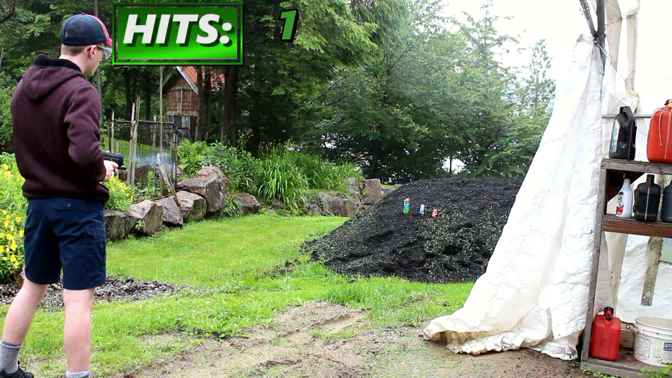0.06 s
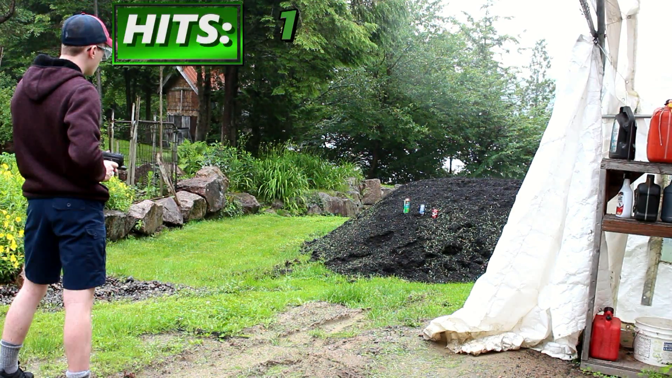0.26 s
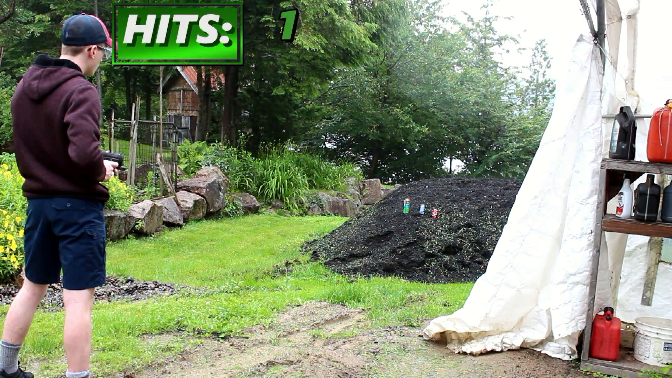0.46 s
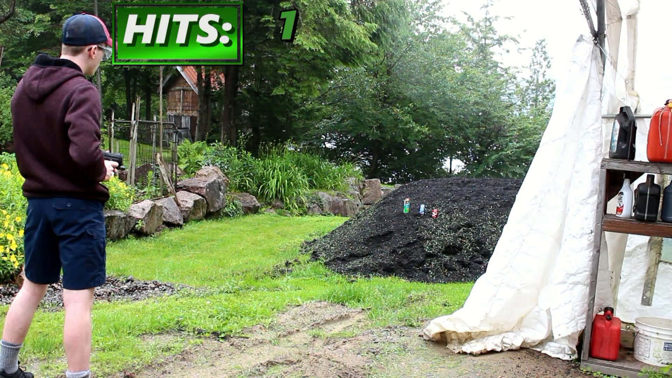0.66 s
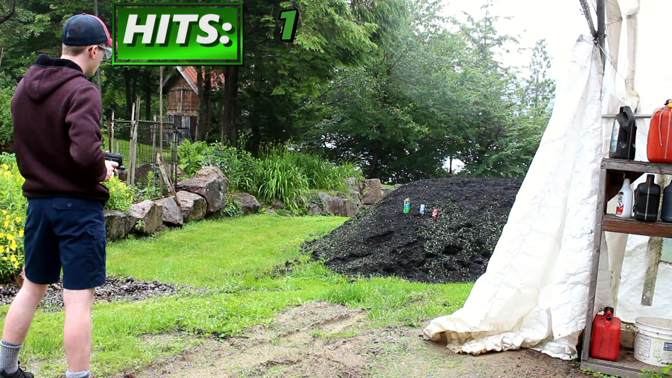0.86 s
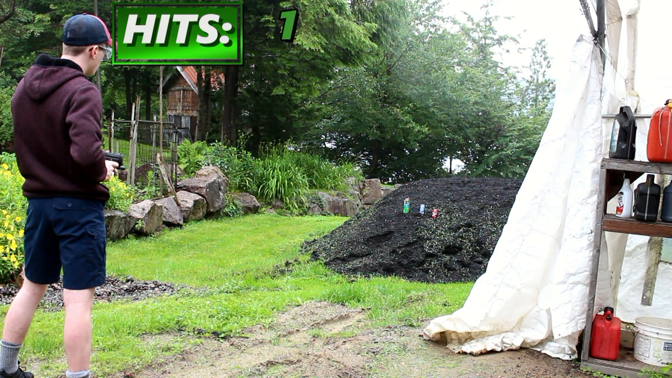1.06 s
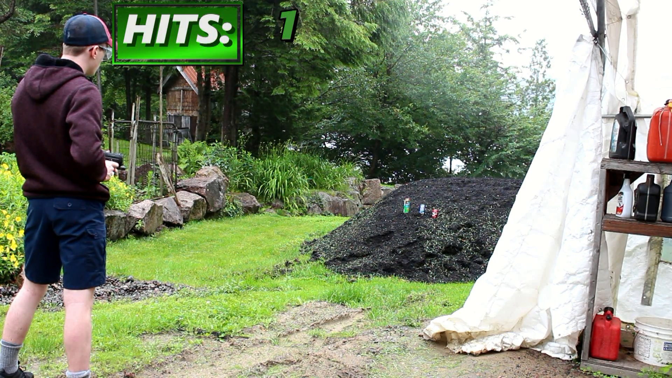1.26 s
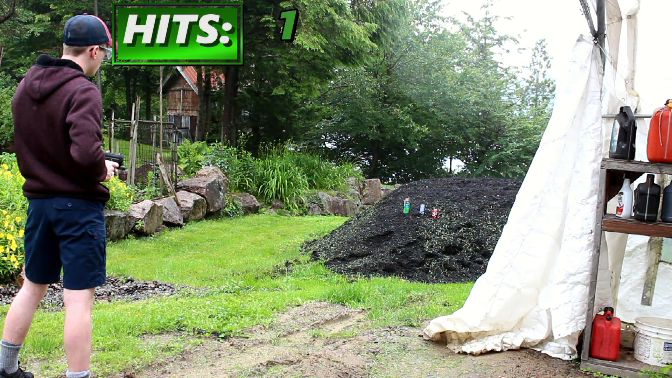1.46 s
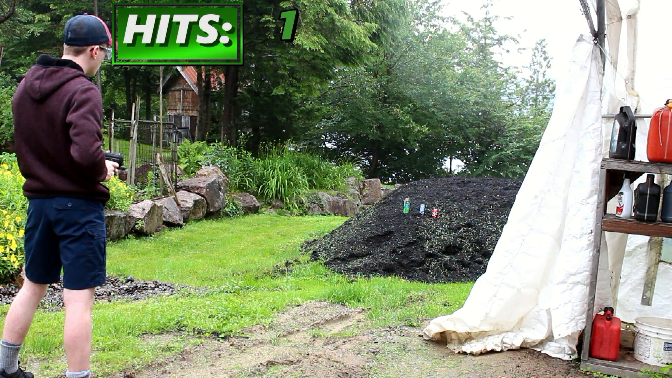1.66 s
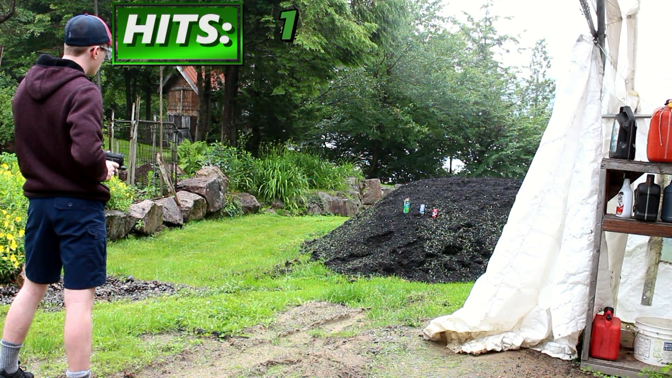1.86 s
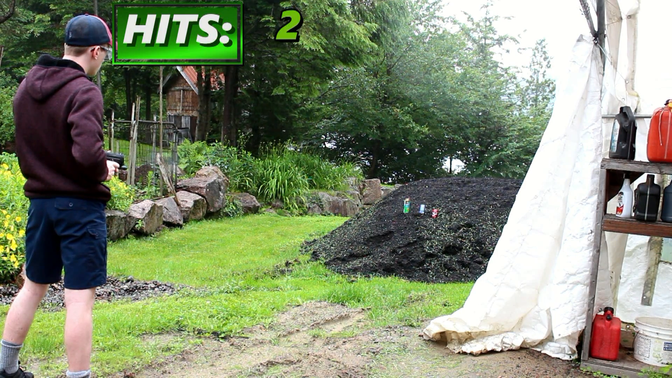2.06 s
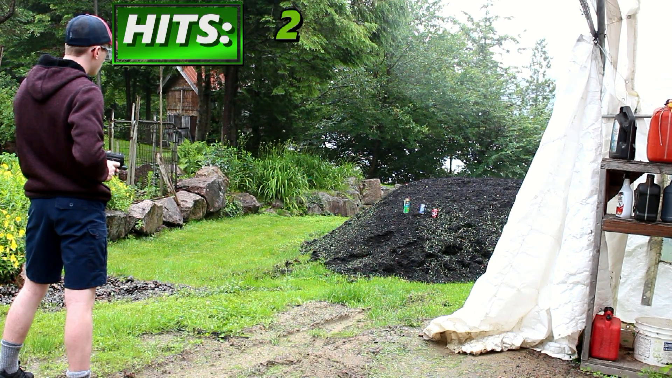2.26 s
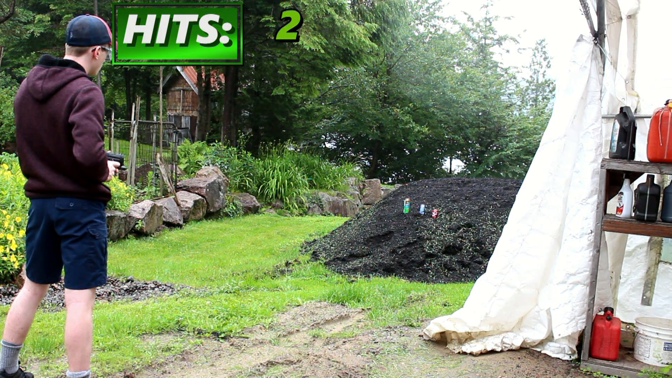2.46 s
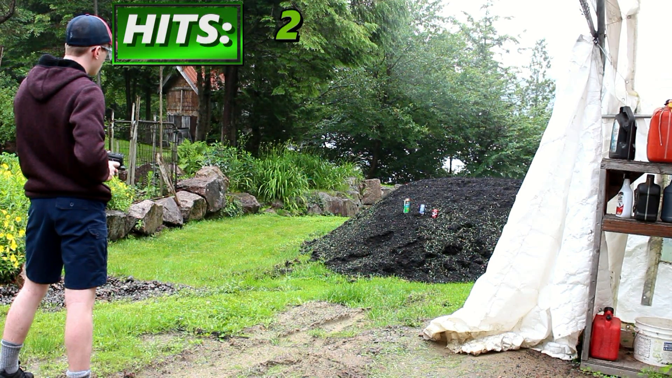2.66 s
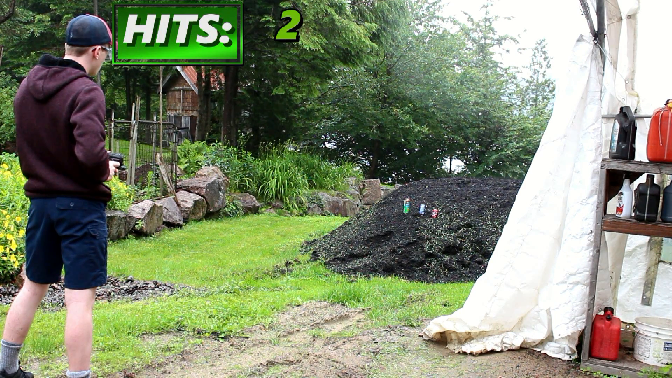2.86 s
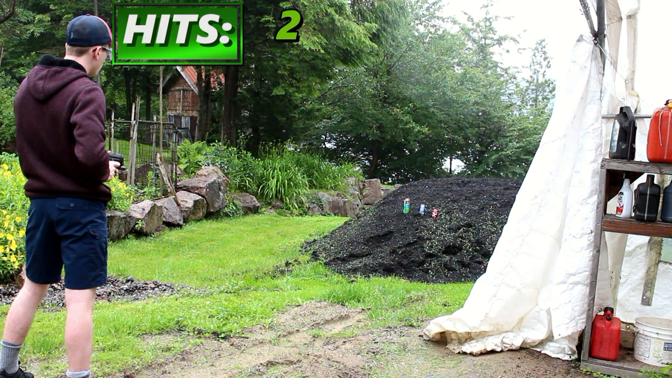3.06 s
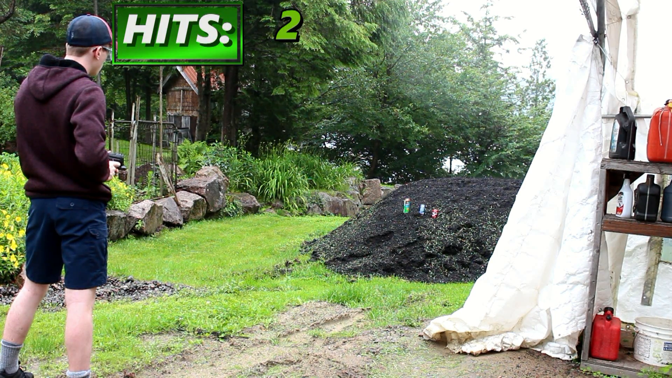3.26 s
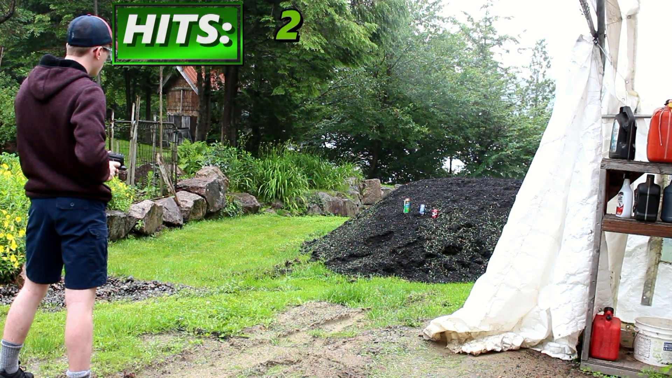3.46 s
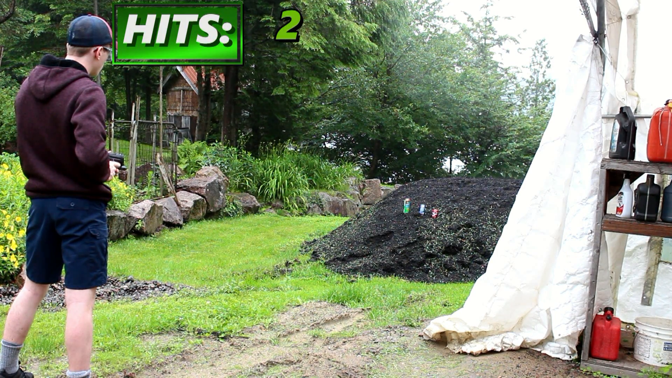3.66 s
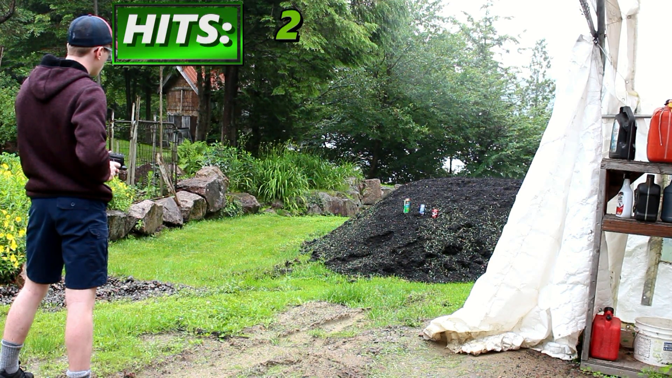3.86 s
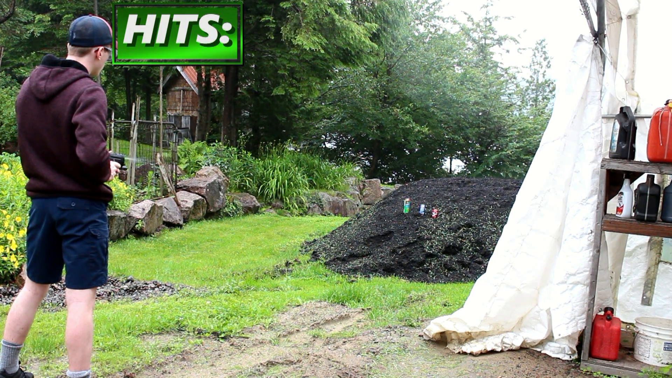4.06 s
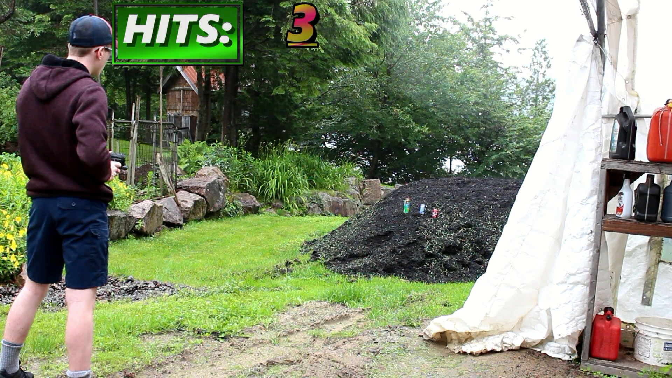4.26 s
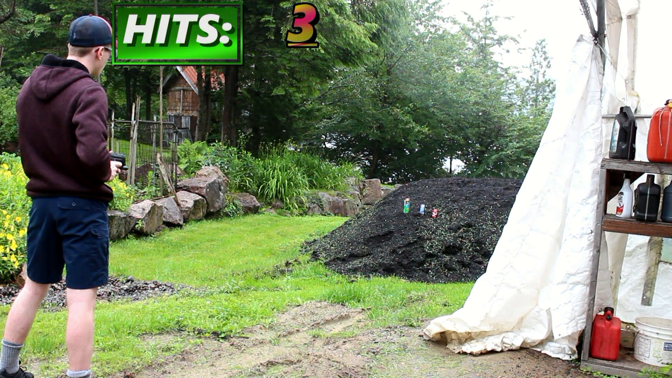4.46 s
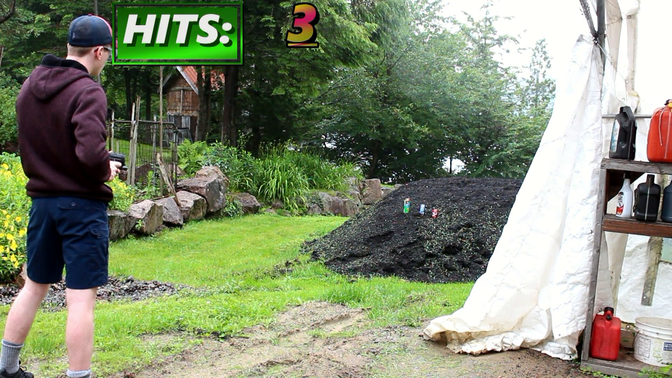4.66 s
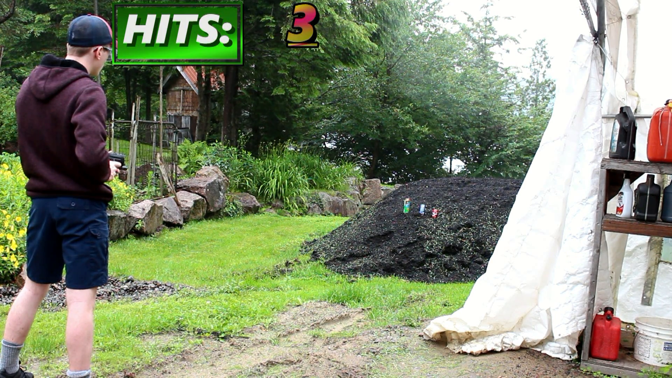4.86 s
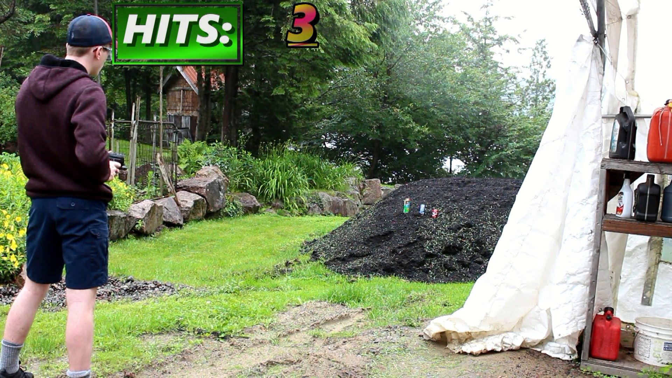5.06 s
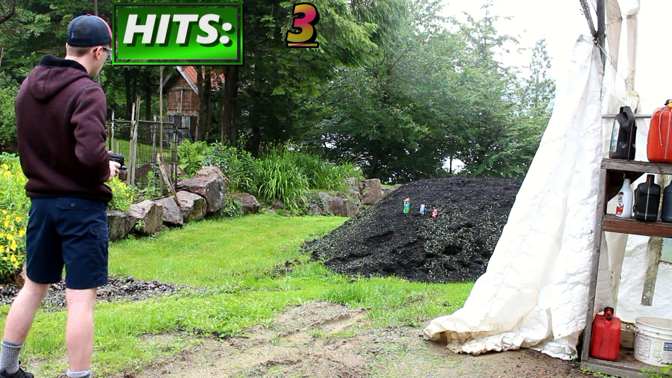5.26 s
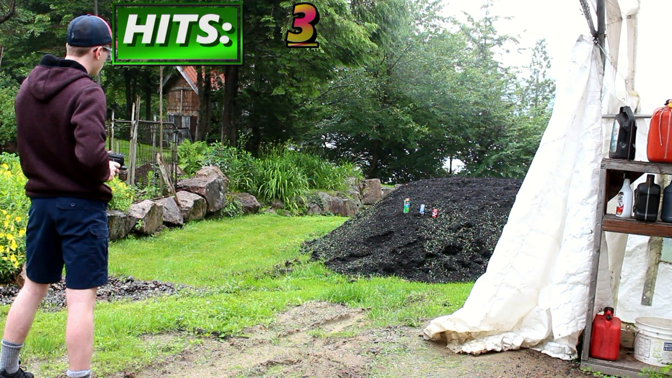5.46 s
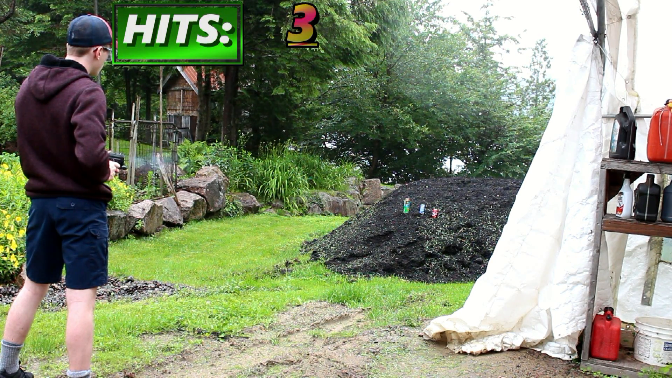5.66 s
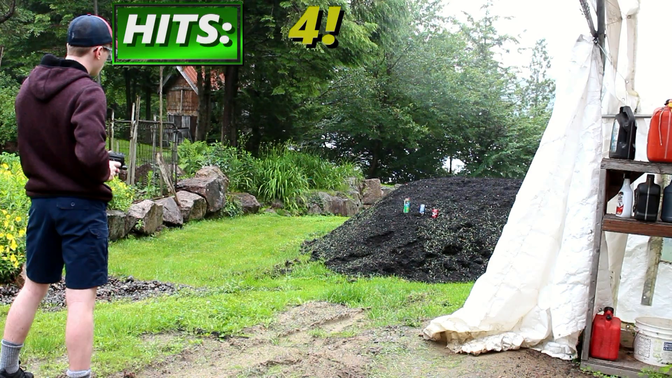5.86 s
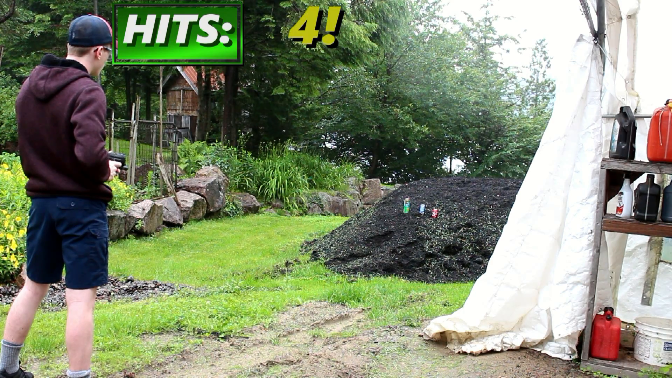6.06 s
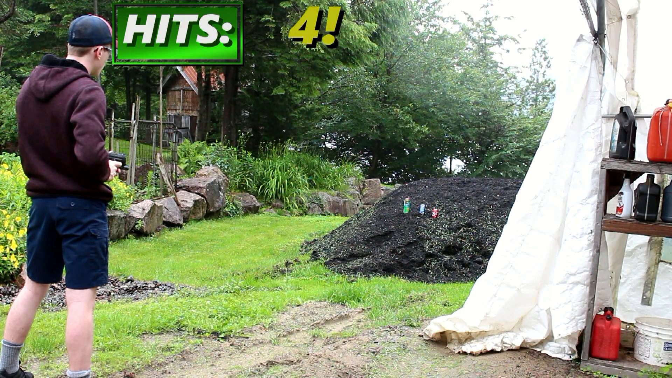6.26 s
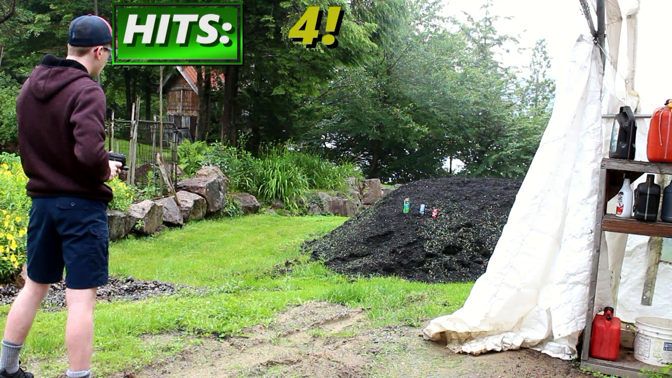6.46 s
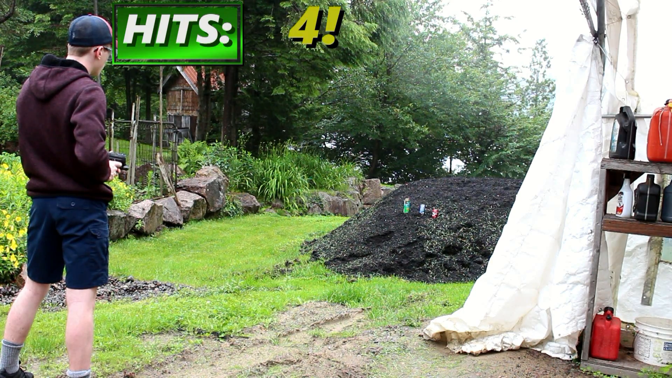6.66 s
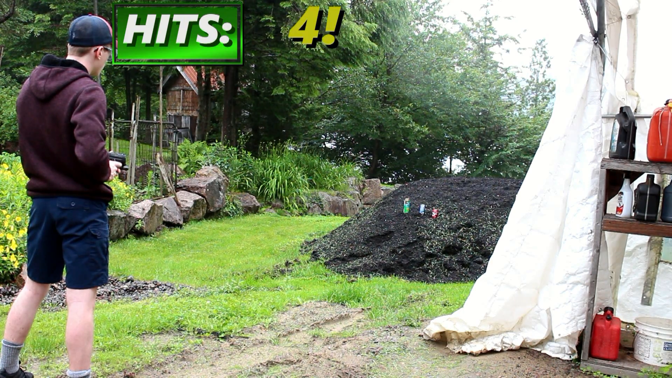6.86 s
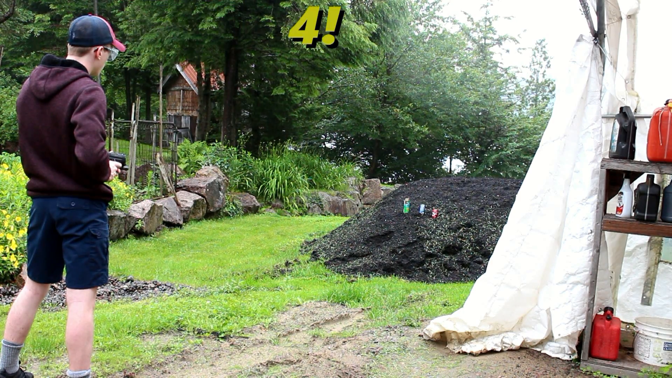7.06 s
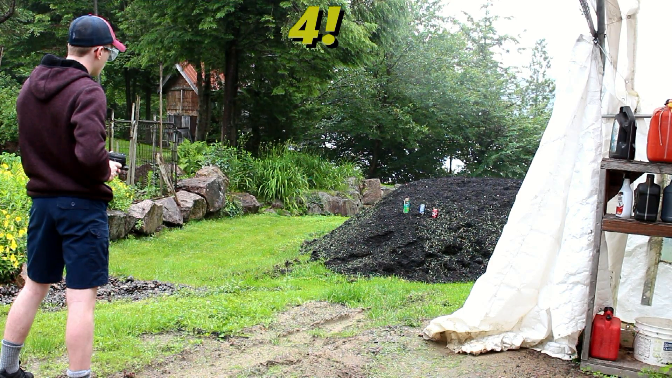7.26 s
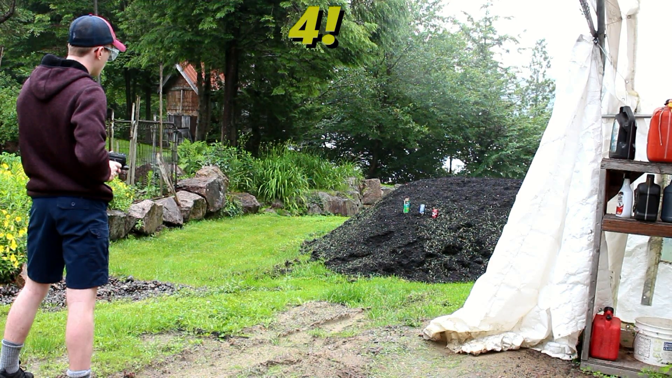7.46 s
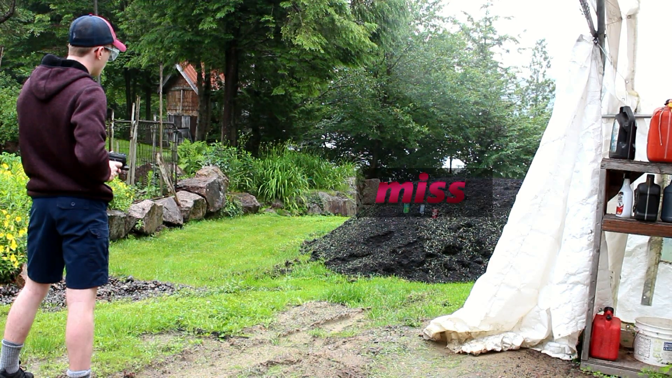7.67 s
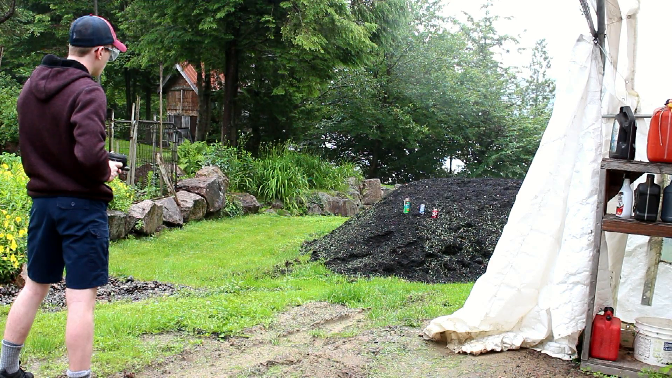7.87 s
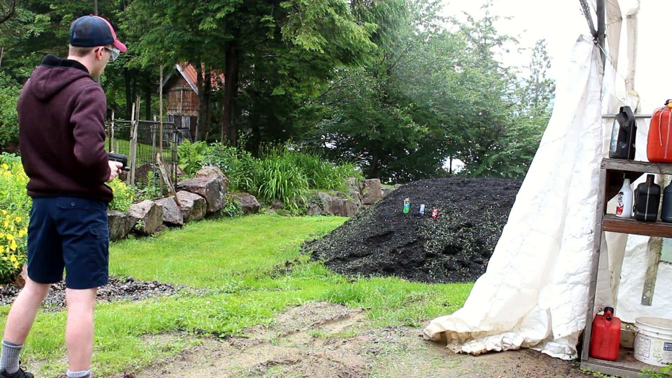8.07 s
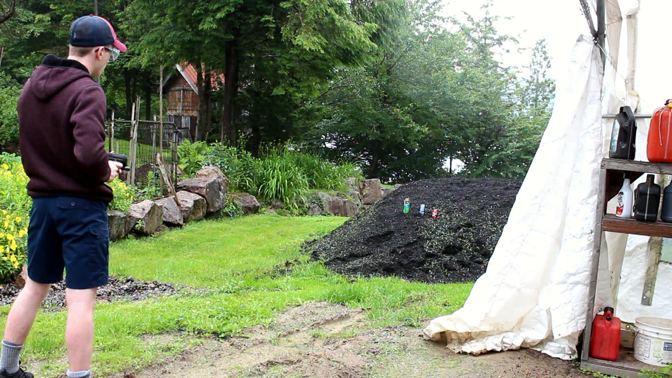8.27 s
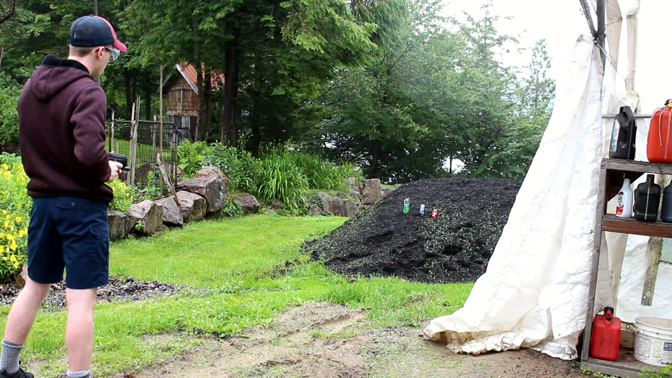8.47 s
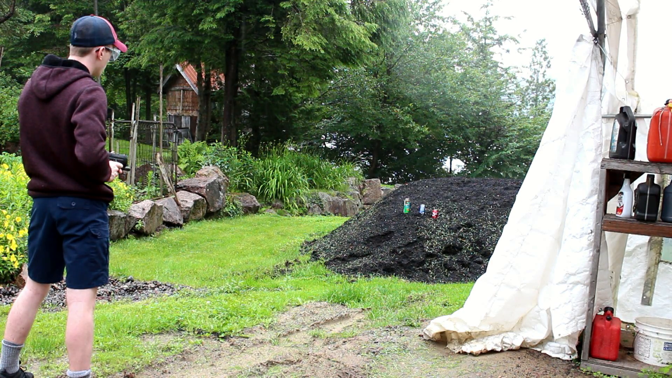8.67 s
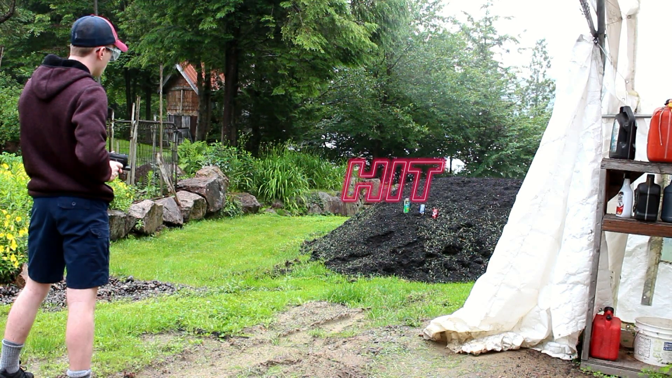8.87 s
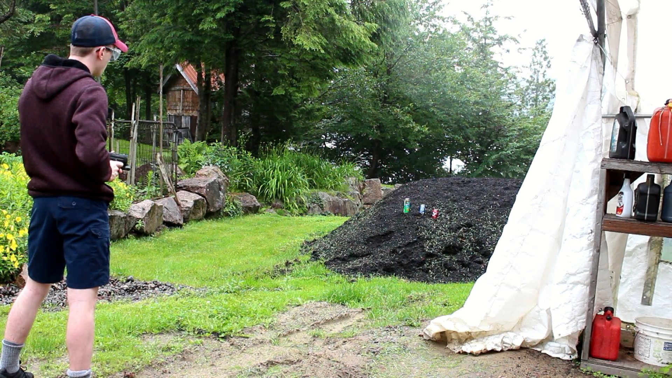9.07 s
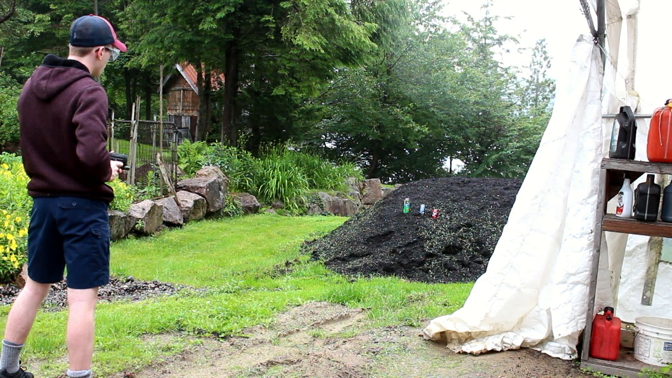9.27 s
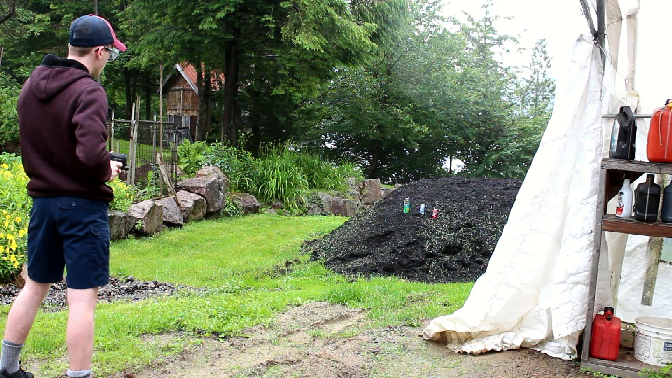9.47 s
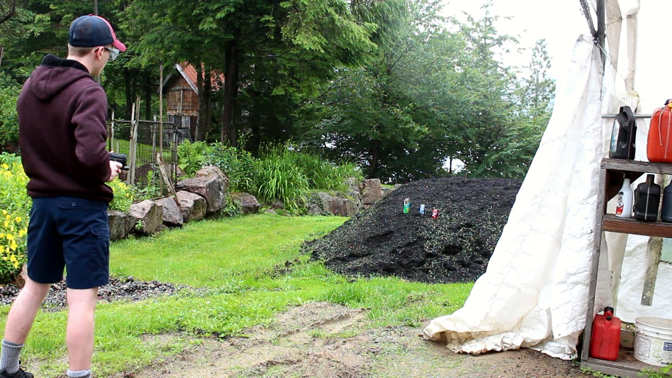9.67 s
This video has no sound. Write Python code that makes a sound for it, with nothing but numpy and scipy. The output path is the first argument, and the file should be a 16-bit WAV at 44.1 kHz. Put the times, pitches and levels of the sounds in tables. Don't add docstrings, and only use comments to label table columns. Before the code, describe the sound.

Steady soft rain and irregular heavier drops on a tarp lie under six loud, snappy pellet pistol shots outdoors. Every crack has a tiny hammer tick and tight, bright echoes fading into the yard. Less than a tenth of a second later, five of the shots smack thin metal cans a little way off, each with different pitch and ring. The fifth shot has no impact. One close microphone, slightly hissy.

```python
import sys
import numpy as np
from scipy import signal
from scipy.io import wavfile
from scipy.ndimage import uniform_filter1d

SR = 44100
rng = np.random.default_rng(int(sys.argv[2]) if len(sys.argv) > 2 else 0)


def level_to_linear(level):
    exponent = np.asarray(level, float) / 20
    return 10 ** exponent


def inscribe(sig):
    pcm = np.round(np.clip(np.atleast_2d(sig).T, -1, 1) * 32767)
    wavfile.write(sys.argv[1], SR, pcm.astype(np.int16))


N = 429093

# start [s], level [dB].
SHOTS_S_DB = [
    (.1444, 0),
    (2.0900, -.7),
    (4.1644, -.3),
    (5.7277, -.3),
    (7.4827, -.5),
    (8.8760, -.3),
]
# frequency [Hz], level [dB].
YARD_HZ_DB = [(59, -78.5), (100, -40), (202, -15), (535, -10), (1080, -5), (1250, -9), (1910, -6.5),
              (3050, -2.5), (6840, -16), (11400, -19), (16000, -27)]
# frequency [Hz], level [dB].
RAIN_HZ_DB = [(25, -15.5), (60, -7.5), (95, -11.5), (200, -16), (400, -7), (550, -3), (850, 0.5),
              (1100, -1), (1600, -6), (2500, -5.5), (3500, -10), (4500, -17), (6200, -26), (12000, -45)]


def evened(x):
    return x / np.sqrt(np.mean(x ** 2) + 1e-20)


def read(points, hz):
    f, value = np.transpose(points)
    return np.interp(np.log(hz + 1), np.log(f + 1), value)


def add(mix, s, sound):
    part = mix[round(s * SR):][:len(sound)]
    part += sound[:len(part)]


def coloured(x, points):
    log_gain = np.log(level_to_linear(read(points, abs(np.fft.fftfreq(4096, 1 / SR)))))
    phase = -signal.hilbert(log_gain).imag
    taps = np.fft.ifft(np.exp(log_gain + 1j * phase)).real[:2048]
    return signal.oaconvolve(x, taps / np.linalg.norm(taps))[:len(x)]


def low_cut(x, hz):
    return signal.sosfilt(signal.butter(2, hz, "high", fs=SR, output="sos"), x)


def ring(hz, db, t60_s, t):
    return level_to_linear(db - 60 * t / t60_s) * np.sin(2 * np.pi * hz * t)


def waver(length):
    drift = uniform_filter1d(rng.standard_normal(length), size=300)
    return .65 + .6 * evened(uniform_filter1d(drift, size=300))


def yard_tail(tilt_db, rise_s, stretch):
    # frequency [Hz], t60 [s].
    yard_hz_t60 = [(100, 0.25), (400, 0.18), (1000, 0.36), (3000, 0.36), (7000, 0.38), (14000, 0.28)]
    hz, t, z = signal.stft(coloured(rng.standard_normal(SR), YARD_HZ_DB), SR, nperseg=256)
    hz = hz[:, None]
    decay_db = -60 * t / stretch / read(yard_hz_t60, hz)
    z = z * level_to_linear(decay_db + tilt_db * np.log2((hz + 100) / 2000))
    clumps = evened(uniform_filter1d(rng.standard_normal(z.shape), size=12, axis=0))
    z = z * level_to_linear(1.2 * rng.standard_normal(len(t)) + 2.5 * clumps)
    tail = signal.istft(z, SR, nperseg=256)[1][:SR]
    return tail * np.clip(np.arange(SR) / SR / rise_s, 0, 1)


def woods():
    level_db, peak_s = -54.5, .17
    u, swell = np.arange(SR) / SR / peak_s, np.zeros(N)
    for s, db in SHOTS_S_DB:
        add(swell, s, level_to_linear(db + level_db) * u * np.exp(1 - u))
    return swell * coloured(rng.standard_normal(N), RAIN_HZ_DB)


def rain_wash():
    hz, t, z = signal.stft(rng.standard_normal(N), SR, nperseg=512)
    patches = uniform_filter1d(rng.standard_normal(z.shape), 6, axis=0)
    patches = evened(uniform_filter1d(patches, 8, axis=1))
    z = z * level_to_linear(read(RAIN_HZ_DB, hz)[:, None] + 2.4 * patches)
    return evened(signal.istft(z, SR, nperseg=512)[1][:N])


def tarp_patter(tarp_hz_db):
    drops_per_s, t60_s = 60, .12
    sizes = level_to_linear(2.1 * np.minimum(rng.exponential(1, N), 2.6)) * (rng.random(N) < drops_per_s / SR)
    power_decay = level_to_linear(-120 * np.arange(3000) / SR / t60_s)
    shake = np.sqrt(signal.oaconvolve(sizes ** 2, power_decay)[:N].clip(0))
    return evened(coloured(shake * rng.standard_normal(N), tarp_hz_db))


def heavy_drops(tarp_hz_db):
    # start [s], peak [dB], tap [dB].
    drops = [(0.779, -38.5, -4), (1.022, -34.5, -14), (1.237, -37.5, -14), (1.348, -44, -8),
             (1.822, -41, -10), (2.053, -37.5, -1), (2.877, -40.5, 2), (2.931, -42.5, -6), (3.0, -39, -11),
             (3.258, -42.5, -8), (3.659, -45.5, -8), (4.0184, -40, -2), (4.655, -35, -7),
             (4.988, -34.5, -10), (5.3257, -38, 1.5), (5.531, -40.5, -1), (5.96, -38, -9),
             (6.069, -39.5, 0), (6.209, -40, 3), (6.361, -37, -1), (6.518, -42, -8), (6.997, -36, -6),
             (7.161, -38, -9), (7.272, -43, -8), (7.883, -36.5, -10), (8.122, -41, -10),
             (9.4745, -47.5, 4.5), (8.843, -37, -6), (9.108, -54, -8), (9.6482, -35, 1.5)]
    slap_db, slap_t60_s = -10, .033
    out, t = np.zeros(N), np.arange(SR // 4) / SR
    for s, db, tap_db in drops:
        t60_s = max(.27 - .01 * (db + 49), .05)
        shake = level_to_linear(db - 9.5 - 60 * t / t60_s) * np.clip(t / .0098, 0, 1)
        slap = level_to_linear(db + tap_db + slap_db - 60 * t / slap_t60_s)
        add(out, s, (shake + slap) * rng.standard_normal(len(t)))
        add(out, s, level_to_linear(db + tap_db + 10) * np.ones(1))
    return coloured(out, tarp_hz_db)


def rain():
    # time [s], level [dB].
    shower_s_db = [(0, -56), (1.27, -54.5), (2.0, -56), (2.8, -55), (3.06, -53), (3.3, -55), (3.95, -56.5),
                   (4.7, -55.5), (5.5, -56), (6.5, -57), (6.95, -54), (7.45, -54.5), (8.7, -55.5),
                   (9.73, -56)]
    # frequency [Hz], level [dB].
    tarp_hz_db = [(100, -20.5), (300, -3), (600, 0), (1000, 3), (1500, -4), (3000, -9.5), (6000, -31.5),
                  (12000, -53.5)]
    level = level_to_linear(np.interp(np.arange(N) / SR, *np.transpose(shower_s_db)))
    steady = level_to_linear(-.5) * rain_wash() + level_to_linear(-4.5) * tarp_patter(tarp_hz_db)
    return level * steady + heavy_drops(tarp_hz_db)


def trigger():
    # start [s], peak [dB], body [Hz], bright part [dB], roughness [0-1].
    ticks = [(0.467, -40, 2610, -23, 0.6), (0.5287, -43.5, 3370, -28, 0.2), (1.9766, -39, 2480, -18, 0.37),
             (5.6067, -36.5, 2580, -25, 0.33), (8.7455, -35.5, 2490, -24, 0.26),
             (9.165, -39, 2500, -28, 0.25), (4.1121, -42, 2020, -12, 0.9), (7.405, -40, 2570, -13.5, 0.44),
             (3.9814, -47, 4550, -20, 0.6), (7.2429, -42, 4260, -25, 0.25), (9.4045, -41, 4760, -26, 0.3),
             (7.713, -45, 5000, -16, .5)]
    t, out = np.arange(1500) / SR, np.zeros(N)
    for s, db, hz, bright_db, rough in ticks:
        rattle = 1 - rough + rough * evened(uniform_filter1d(rng.standard_normal(len(t)), size=9))
        click = low_cut(rng.standard_normal(len(t)), 2000) * level_to_linear(-19 - 60 * t / .017)
        modes = ring(hz, 0, .032 * (2500 / hz) ** 2, t) + ring(9200, bright_db, .04, t)
        add(out, s, level_to_linear(db - 1) * (modes * rattle + click))
    return out


def cans():
    # start [s], level [dB], crack [dB], yard [dB], tilt [dB per octave].
    hits = [
        (.2158, -5.5, -13, -29.5, -0.5),
        (2.1629, -9, -12.5, -29.5, 0.1),
        (4.2373, -11.5, -13, -25, -1.7),
        (5.8011, -12, -12.5, -23, -2),
        (8.9494, -10.5, -12, -29, -2),
    ]
    # frequency [Hz], width [Hz], level [dB].
    can_modes = [
        [(600, 340, -3.5), (1500, 300, -24), (2300, 125, 1), (2530, 140, -1), (3250, 93, -4.5),
         (3490, 138, -5.5), (4180, 180, -2), (5840, 200, -9.5)],
        [(820, 110, -9), (1600, 400, -15), (1880, 220, 3), (2870, 300, 3), (3360, 120, -4), (3840, 220, 0.5),
         (6000, 580, -6), (7350, 300, -7)],
        [(453, 230, -10), (1576, 61, -7), (2090, 170, 2), (2380, 140, 0.5), (3086, 110, -12), (3610, 180, 1),
         (4360, 130, -1.5), (5480, 120, -3)],
        [(805, 250, -3.5), (1415, 52, -2.0), (1870, 120, 2.5), (3000, 110, -7.5), (3250, 120, -11),
         (4770, 100, -11.0), (6300, 160, -7)] + [(446, 260, 5)],
        [(503, 330, -15), (856, 140, 3), (1110, 140, 2.5), (1740, 450, 3), (2480, 200, 5.5), (3100, 140, 0),
         (3930, 200, -14), (5170, 210, -7)],
    ]
    # frequency [Hz], level [dB], t60 [s].
    wall_modes = [
        [(770, -34.5, 0.24), (2500, -32, 0.29), (3300, -38, 0.22)],
        [(754, -28, 0.24), (1410, -42, 0.14), (2930, -26, 0.097), (3960, -41, 0.23)],
        [(560, -48, 0.5), (622, -41.5, 0.99), (737, -36.5, 0.37), (846, -30, 0.27), (925, -57, 0.2),
         (1028, -24.5, 0.29), (1116, -31, 0.62), (1130, -41, 0.19), (1410, -18, 0.19), (3210, -11.5, 0.079)],
        [(714, -35.5, 0.5), (1405, -25, 0.29), (2400, -24, 0.24), (3120, -24, 0.15)],
        [(620, -28, 0.24), (900, -38, 0.3), (2500, -42, 0.16), (3350, -36, 0.2)],
    ]
    t, out = np.arange(SR // 2) / SR, np.zeros(N)
    for (s, db, crack_db, yard_db, tilt_db), modes, bell in zip(hits, can_modes, wall_modes):
        body = sum(ring(hz, level_db, 2.9 / max(width_hz, 60), t) for hz, width_hz, level_db in modes)
        crumple = coloured(rng.standard_normal(len(t)) * level_to_linear(-60 * t / .049), YARD_HZ_DB)
        snap = signal.lfilter([1, -1], [1, -.6], rng.standard_normal(len(t))) * level_to_linear(-60 * t / .0046)
        add(out, s, level_to_linear(db) * body + level_to_linear(crack_db) * (crumple + .63 * snap))

        tail = yard_tail(tilt_db, .006, .83) + level_to_linear(-17) * yard_tail(tilt_db, .038, 2.42)
        can_colour = body[:130] / np.linalg.norm(body[:130])
        tinted = signal.oaconvolve(tail, can_colour)[:SR]
        add(out, s, level_to_linear(yard_db) * (.97 * tail + .17 * tinted))

        ringing = np.zeros(len(t))
        for hz, level_db, t60_s in bell:
            pair = ring(hz, level_db - 2, t60_s, t) + ring(hz * 1.045, level_db - 7, .64 * t60_s, t)
            ringing += pair * waver(len(t))
        add(out, s + .004, ringing * np.clip(t / .015, 0, 1))
    return low_cut(out, 503)


def rib_echoes():
    first_ms, step_ms, warp_ms, first_db, gain_db = 10.47, .5, .07, -12.8, .7
    echoes = []
    for k in range(6):
        warp = warp_ms * (-1) ** k if k > 2 else 0
        echoes.append((first_ms + k * step_ms + warp, first_db + k * gain_db))
    return echoes


def blast():
    # delay [ms], level [dB], sign, pulse length [ms].
    paths = [
        (.5, -2.5, -1, .035),
        (1.74, 2.5, -1, .034),
        (1.835, -1, -1, .022),
        (1.90, 2.5, 1, .032),
        (2.07, -7, -1, .045),
        (2.84, -12, -1, .04),
        (4.07, 2, -1, .055),
        (6.2, -11, -1, .04),
    ]
    # delay [ms], level [dB].
    walls = [
        (13.7, -12),
        (14.65, -12),
        (17.1, -18),
        (18.25, -15),
        (25.3, -14),
        (40, -17),
    ]
    ms, out = np.arange(2000) / SR * 1000, np.zeros(2000)
    for delay_ms, db, sign, length_ms in paths:
        u = (ms - delay_ms) / length_ms
        suction = np.where(u > 0, u / 6 * np.exp(-abs(u) / 6), 0)
        out += sign * level_to_linear(db) * (np.exp(-u ** 2) - .6 * suction)
    for delay_ms, db in walls + rib_echoes():
        u = (ms - delay_ms) / .11
        out += level_to_linear(db) * 2.3 * u * np.exp(-u ** 2)
    return out


def pistol():
    # arrival [ms], level [dB], t60 [ms], tilt [dB per octave].
    scatter = [(.6, -17, 75, -2.5), (4.23, -31, 14, -4), (10.8, -23.5, 25, -5), (12.07, -24.5, 12, -1.5),
               (15.63, -20.5, 32, -4.5), (25.4, -29, 36, -3.5), (39.6, -31, 29, -2), (73.3, -34.5, 26, -5),
               (126, -48, 23, -5.5), (131.3, -42, 32, -6), (139, -57, 21, -4.5), (156.7, -45.5, 38, -8),
               (230.4, -46.5, 42, -7)]
    # frequency [Hz], level [dB].
    near_hz_db = [(59, -70.5), (100, -24.5), (1030, -4), (1360, -1.5), (1830, -9.5), (2130, -32), (3190, 1),
                  (4770, -2), (5900, -3), (6420, -7.5), (11400, -3.5), (15000, -5.5), (16000, -29)]
    ms, out = np.arange(SR // 3) / SR * 1000, np.zeros(N)
    echo = evened(rng.standard_normal(len(ms)) * level_to_linear(3.2 * rng.standard_normal(len(ms))))
    tail = yard_tail(.1, .05, .85) + level_to_linear(-16) * yard_tail(.1, .02, 1.9)
    push = blast()
    hammer_ms = ms[:900]
    hammer = ring(2500, -26, .015, hammer_ms / 1000) + ring(1400, -27, .015, hammer_ms / 1000)
    for s, db in SHOTS_S_DB:
        facets = 1.16 * echo + .87 * rng.standard_normal(len(ms))
        add(out, s - .002, level_to_linear(db + 3) * hammer * np.clip(hammer_ms / .4, 0, 1))
        add(out, s - .0033, level_to_linear(db - 5) * hammer)
        add(out, s, level_to_linear(db) * push)
        for at_ms, level_db, t60_ms, tilt_db in scatter:
            colour = [(hz, value + tilt_db * np.log2(hz / 2000)) for hz, value in near_hz_db]
            decay = level_to_linear(db + level_db - 60 * abs(ms - at_ms) / t60_ms)
            rise = np.clip((ms - at_ms) / 1.7, 0, 1)
            add(out, s, coloured(decay * rise * facets, colour))
        add(out, s, level_to_linear(db - 19) * (.84 * tail + .5 * yard_tail(.1, .033, .64)))
    return low_cut(out, 175)


def scene():
    return np.tile(woods() + rain() + trigger() + cans() + pistol(), (2, 1))


def roll_off(x):
    return signal.sosfilt(signal.butter(12, 16460, fs=SR, output="sos"), x)


def record(dry):
    # frequency [Hz], level [dB].
    hiss_hz_db = [(20, 8.5), (45, 10), (80, 7), (200, 5.5), (1000, -2), (5000, -1), (15000, -3.5),
                  (15700, 1.5), (15900, -47)]
    hiss_db, hum_hz, hum_db, edge_hz = -65, 60, -72, 16100
    hiss = np.array([coloured(row, hiss_hz_db) for row in rng.standard_normal(dry.shape)])
    hum = level_to_linear(hum_db) * np.sin(2 * np.pi * hum_hz * np.arange(N) / SR)
    limited = np.clip(dry + level_to_linear(hiss_db) * hiss + hum, -.97, .97)
    taps = signal.firwin(255, edge_hz, window="blackman", fs=SR)
    mix = signal.oaconvolve(limited, taps[None], "same")
    return roll_off(mix)


dry = scene()
out = record(dry)
inscribe(out)
```